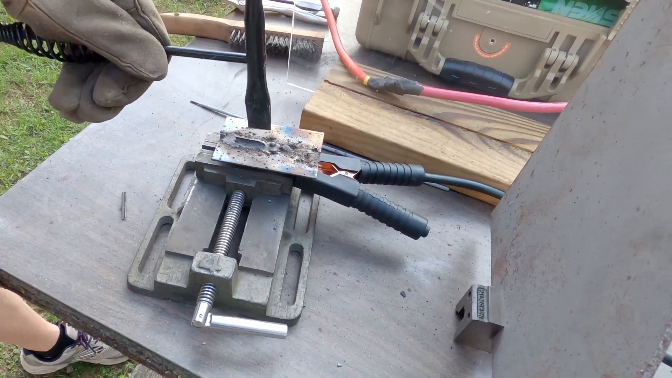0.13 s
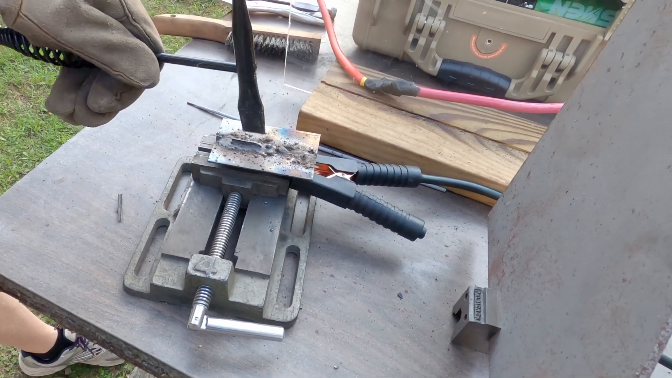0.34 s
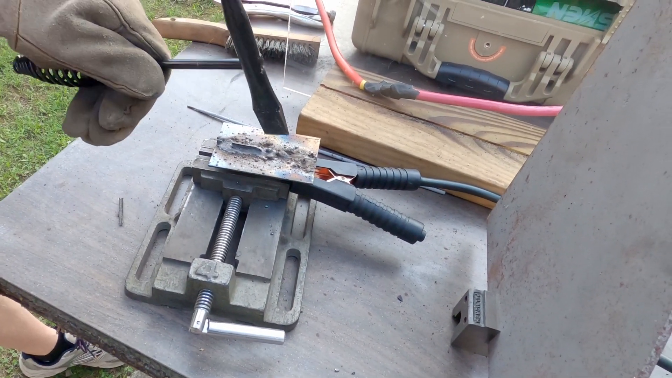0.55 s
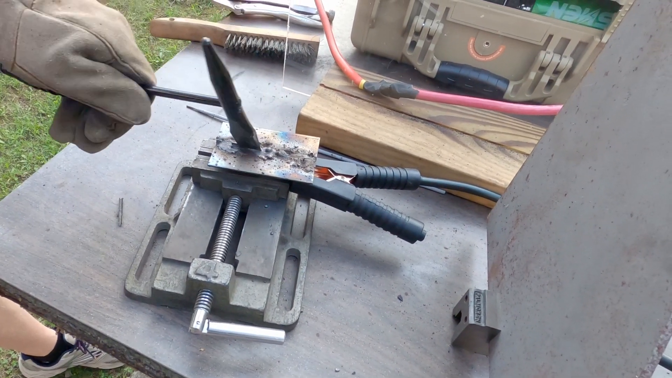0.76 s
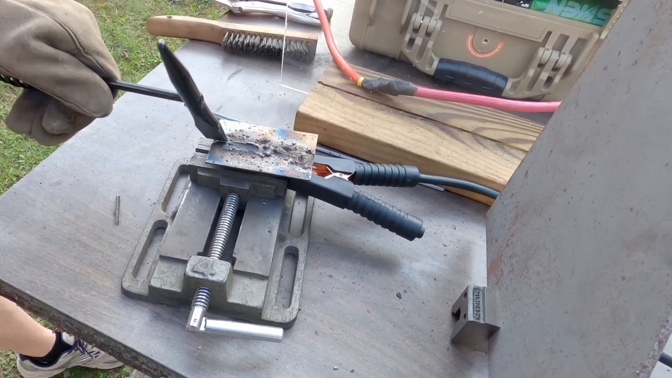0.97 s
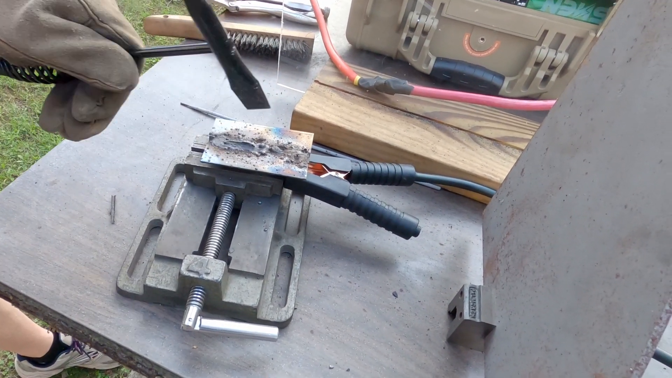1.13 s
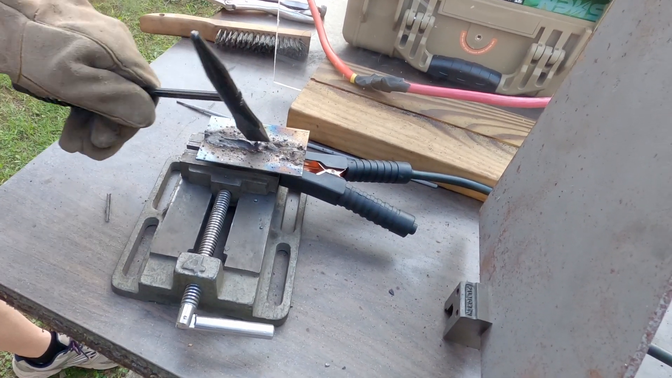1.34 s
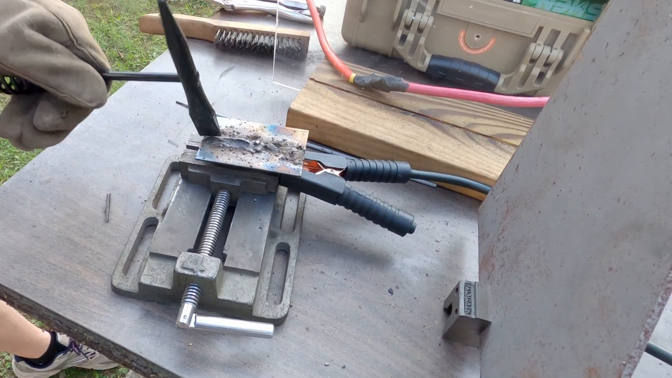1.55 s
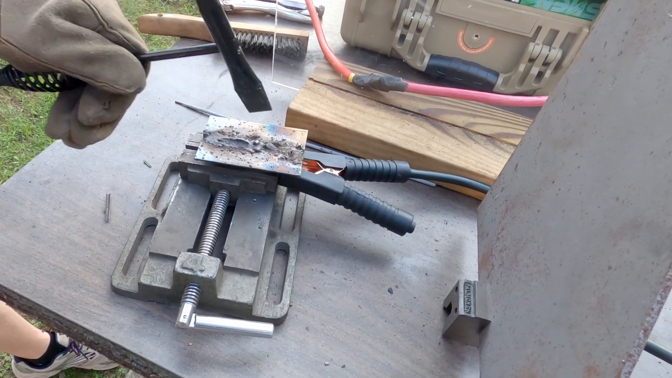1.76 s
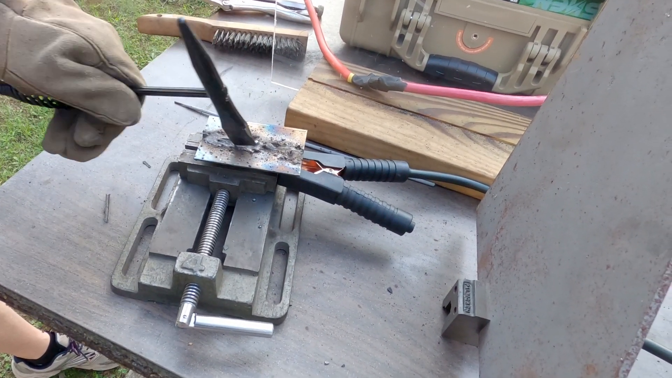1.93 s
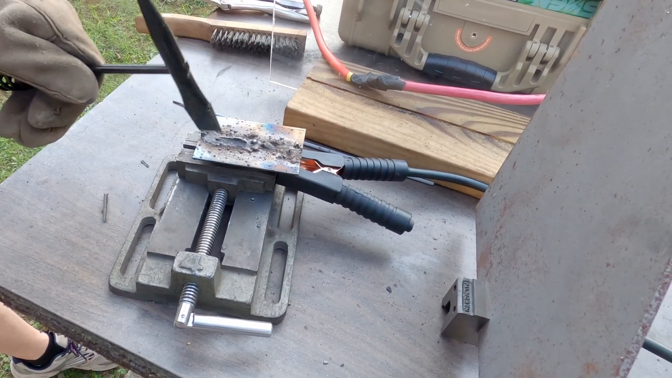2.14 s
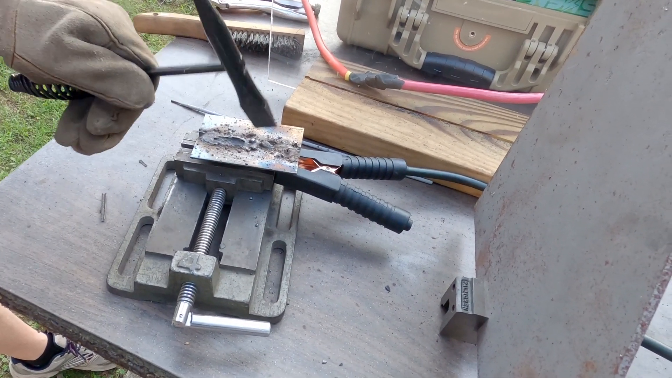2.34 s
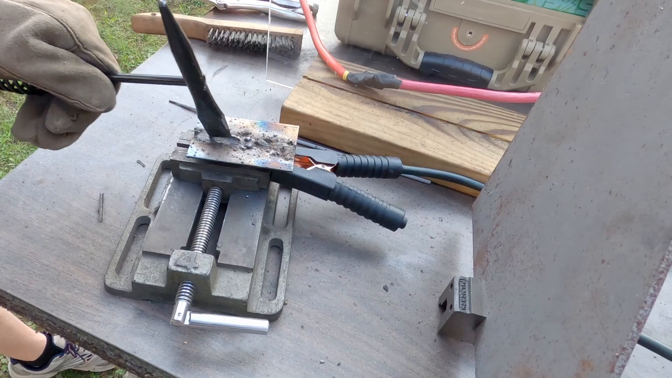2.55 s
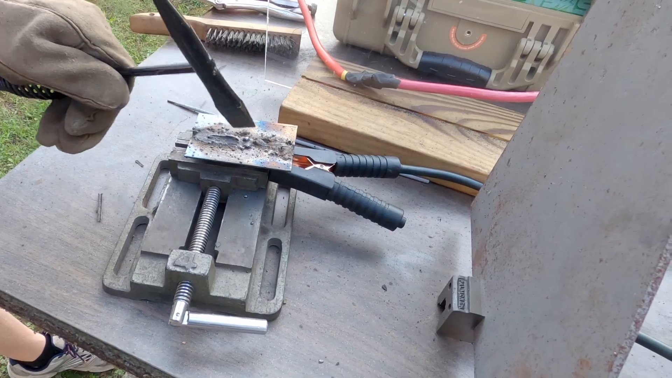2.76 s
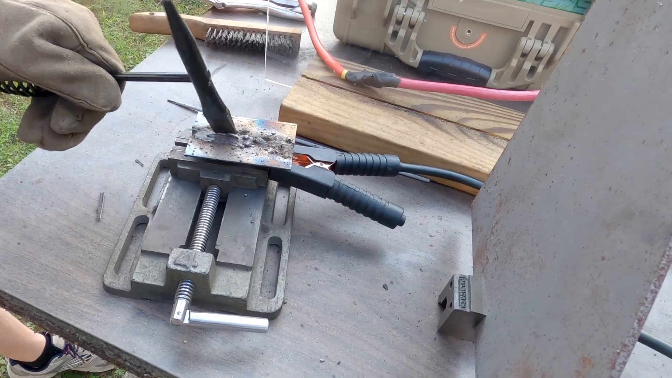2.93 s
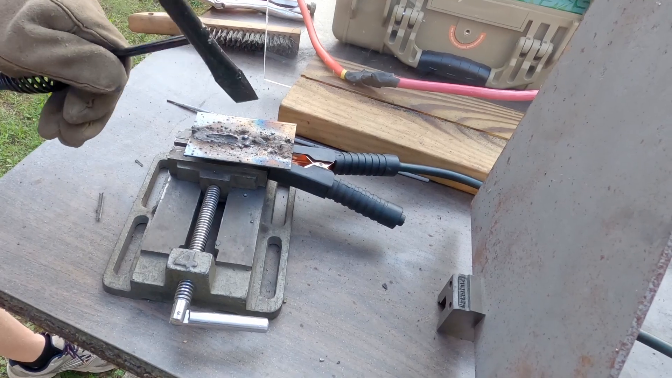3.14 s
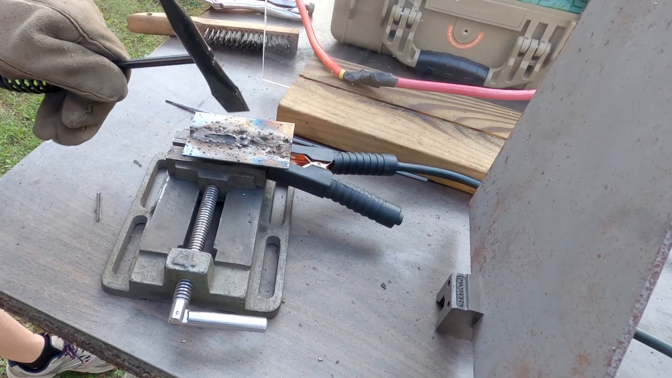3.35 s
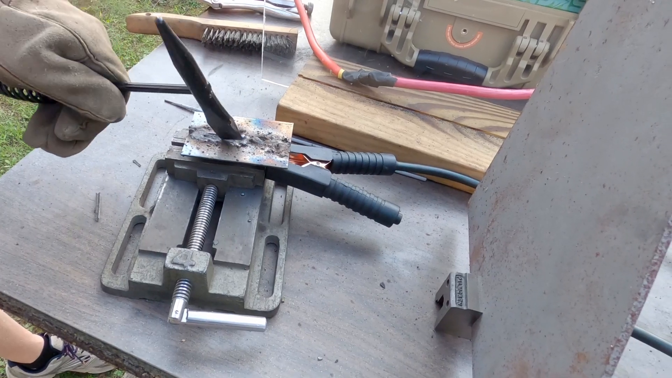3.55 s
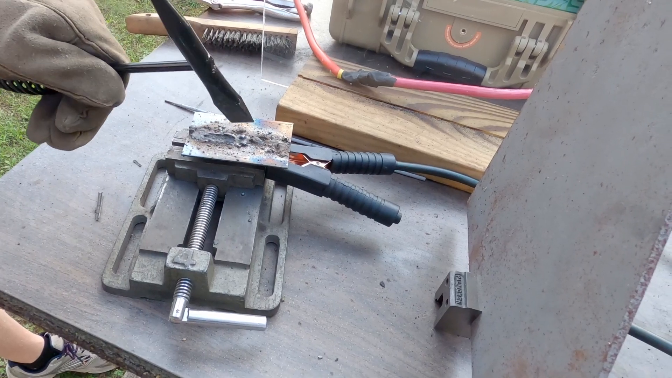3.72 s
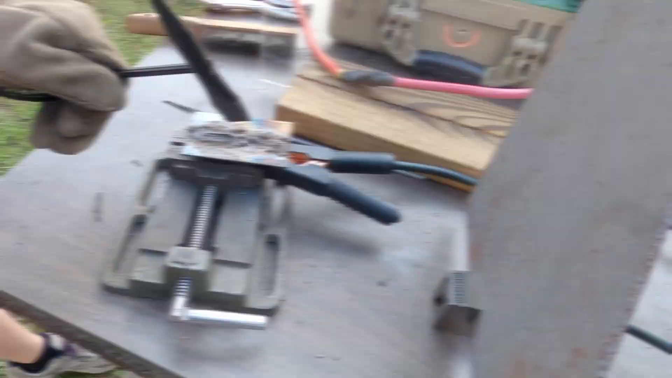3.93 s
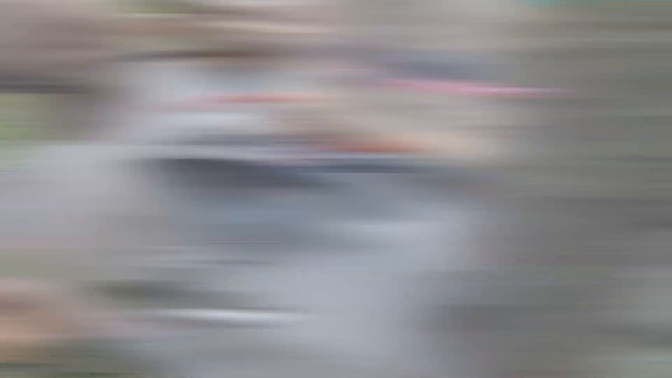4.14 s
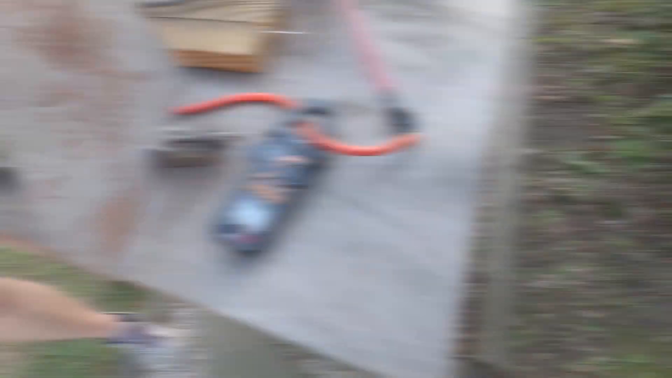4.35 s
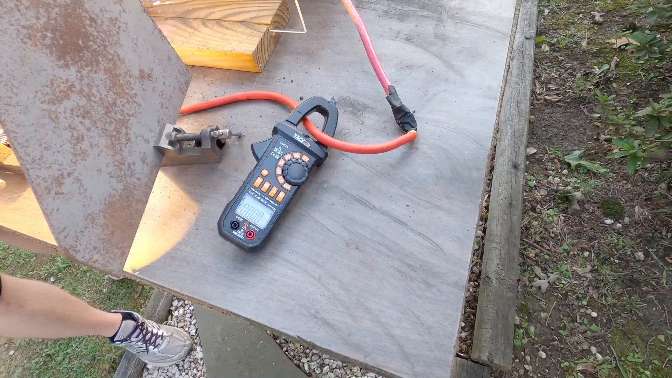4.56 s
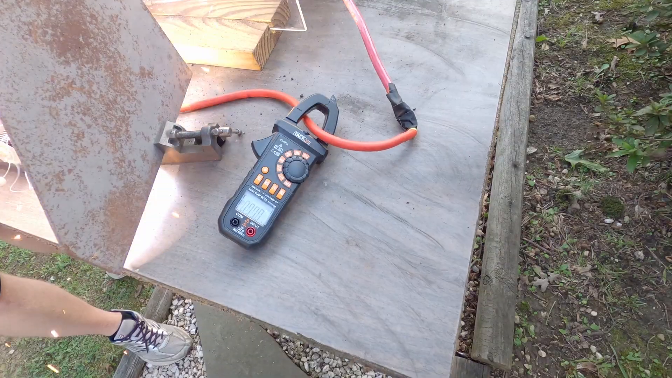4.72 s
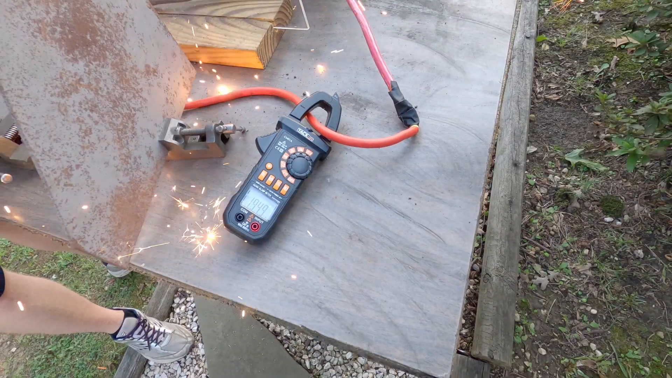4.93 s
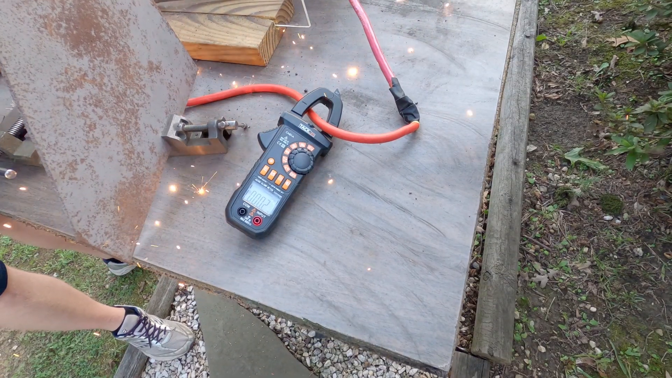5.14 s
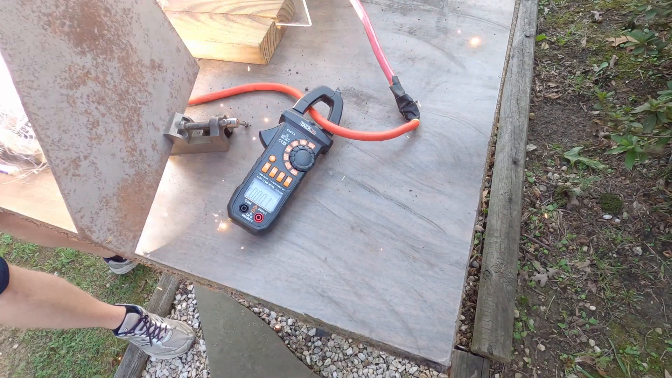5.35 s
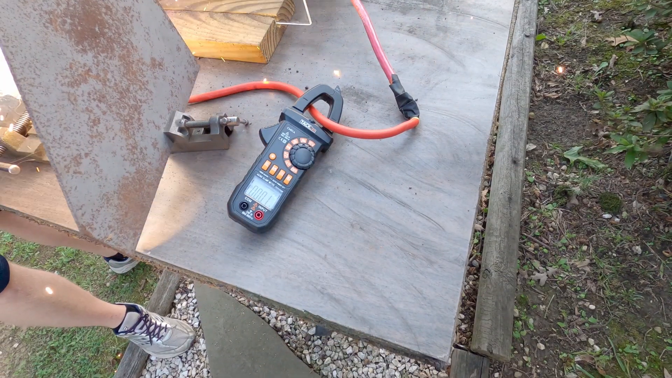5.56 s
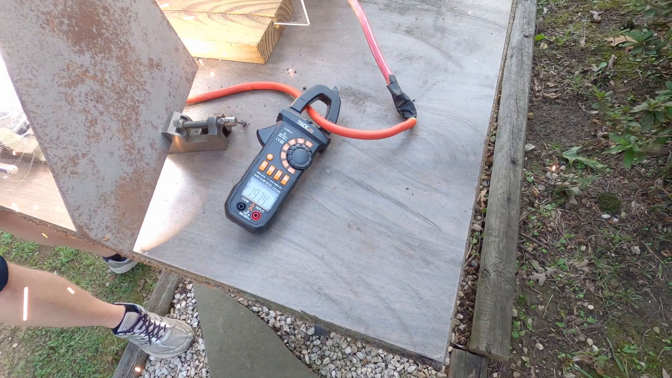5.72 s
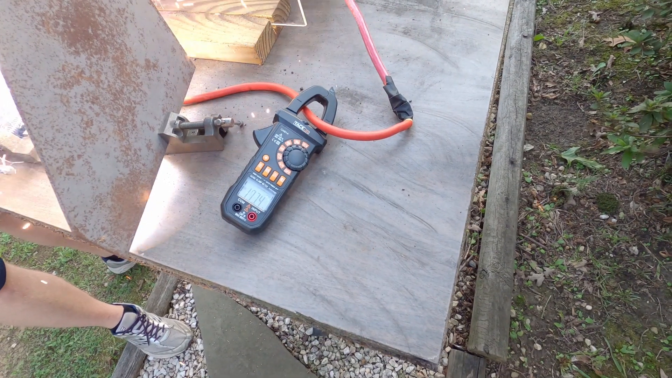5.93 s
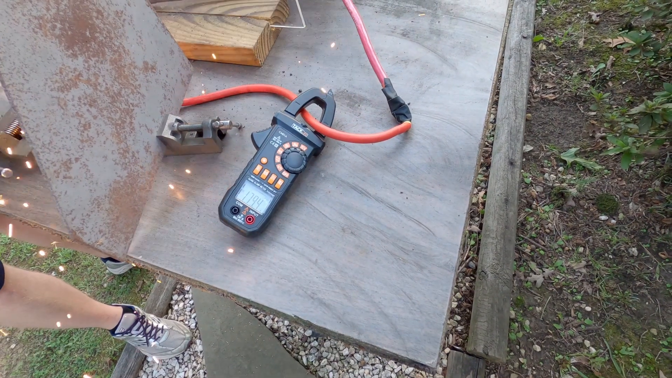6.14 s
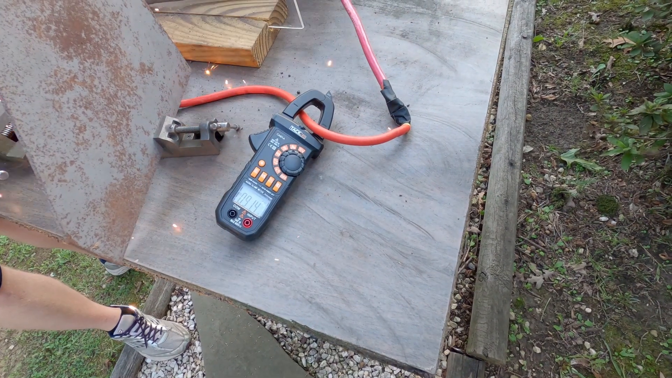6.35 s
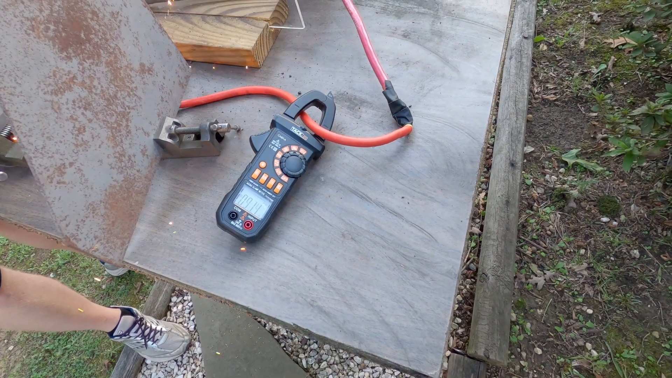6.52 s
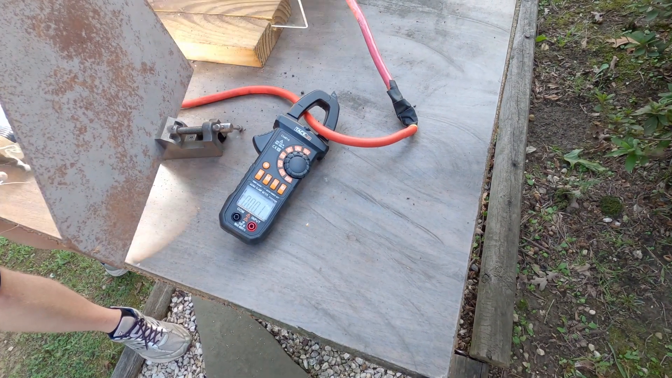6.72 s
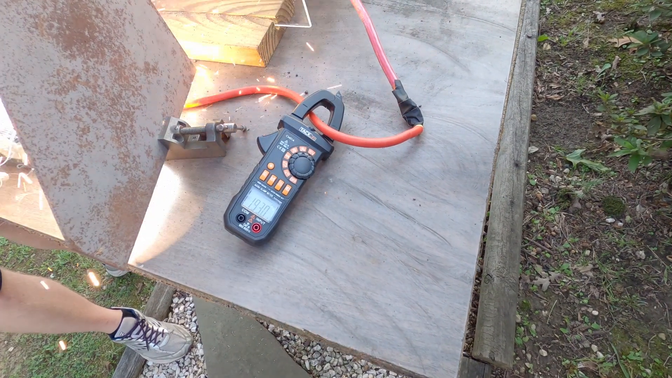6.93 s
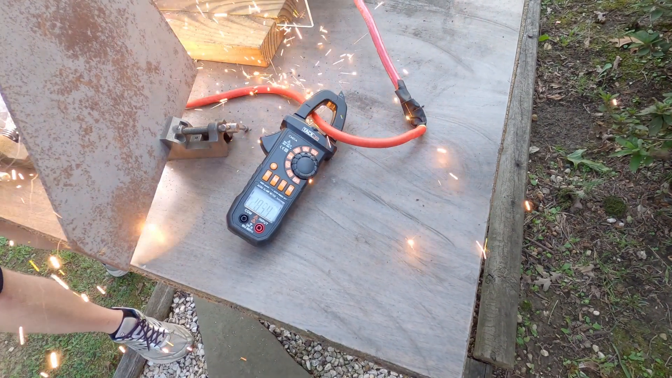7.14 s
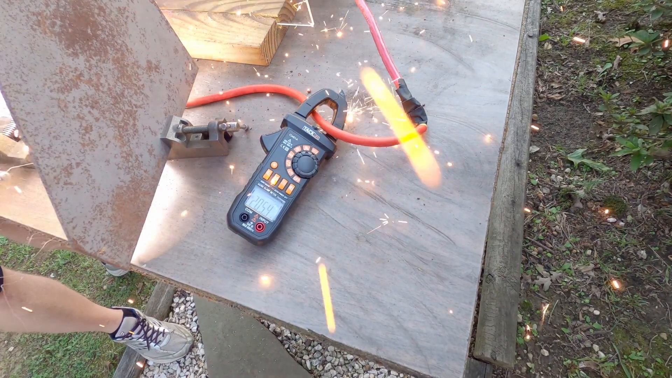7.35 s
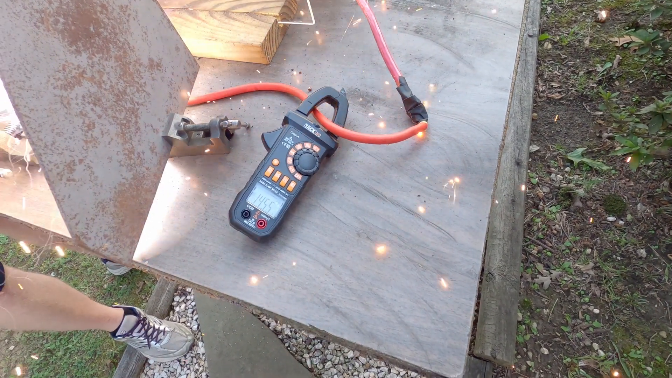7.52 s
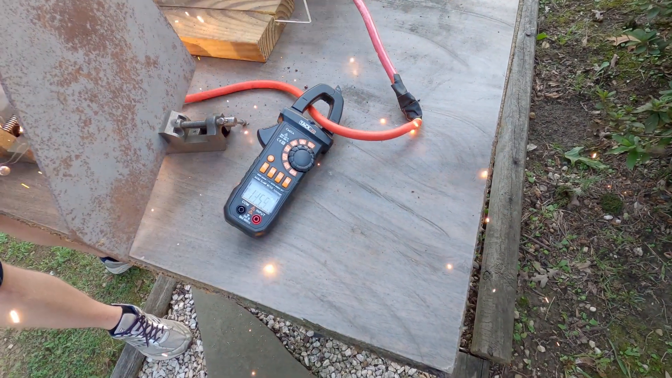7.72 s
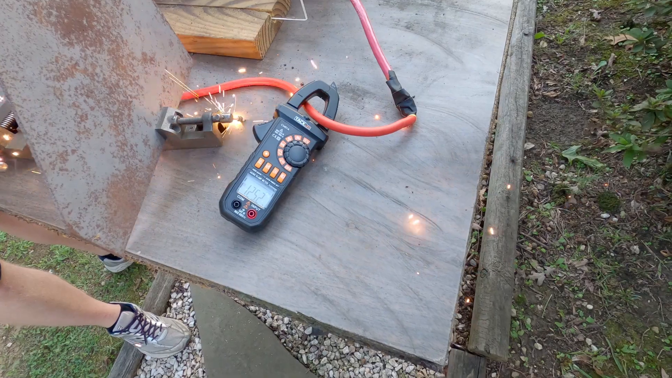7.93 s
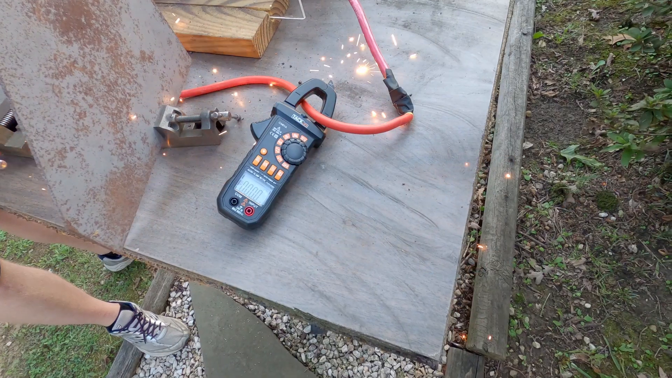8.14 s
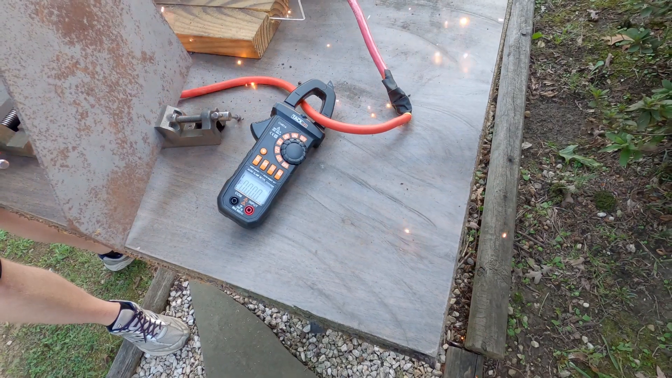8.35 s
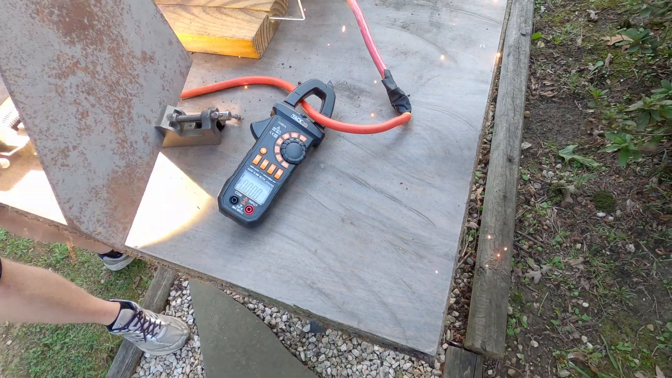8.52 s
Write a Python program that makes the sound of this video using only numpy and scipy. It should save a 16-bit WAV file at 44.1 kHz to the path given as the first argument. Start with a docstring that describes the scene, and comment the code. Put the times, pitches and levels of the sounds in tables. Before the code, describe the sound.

Outdoors at a workbench, close and nearly mono. For the first 0.6 seconds there is only soft lumpy wind, airy hiss, a faint far motor hum and very thin tones. Then a chipping hammer hits steel in a vice at about 0.65, 1.3, 1.9, 2.4, 2.8, 3.2, 3.5, 3.8 and 4.0 seconds: hard, short clanks, varying from dull to bright, slightly overloaded, with little rebound ticks and gritty slag scrapes after them. At 4.2 an abrupt cut drops the background, with a low bump. A welding arc burns at 4.4-4.75, blips at 5.06, burns at 5.3-6.1 and 6.7-7.6, and again briefly at 8.45-8.6. Each burn is a bright, ragged frying hiss with low roar, uneven lulls and loud snapping spits; the first three start with a rod tap. Between them come fading slag fizz, tiny spark ticks, faint bumps and quiet wind.

```python
"""First a chipping hammer strikes and scrapes slag off a steel plate in a vice on an outdoor bench:
decaying steel modes are struck by blows and taps, then driven by grit, over a far motor hum and thin tones.
After a cut to a quieter moment a welding arc behind a steel screen strikes five times: filtered noise hisses
and roars, impulses spit, and dull bumps, sparks and cooling slag follow.
Wind and a background hiss, both of shaped noise, lie under both moments."""
import sys
import numpy as np
from scipy import signal
from scipy.fft import rfft, irfft, next_fast_len
from scipy.io import wavfile

SR = 44100
rng = np.random.default_rng(int(sys.argv[2]) if len(sys.argv) > 2 else 0)


def gain_from_db(level_db):
    """Convert decibel levels to linear amplitude factors (20 dB per decade)."""
    decades = np.asarray(level_db, float) / 20
    return 10 ** decades


def wrap_up_sound(samples):
    """Save the sound to the file named by the first command line argument, as 16-bit audio."""
    columns = np.atleast_2d(samples).T
    # keep every value between -1 and 1, then stretch to whole-number steps
    tamed = np.clip(columns, -1, 1)
    steps = np.round(tamed * 32767).astype(np.int16)
    wavfile.write(sys.argv[1], SR, steps)


N = 378378
TIME = np.arange(N) / SR
CUT_S = 4.215  # the hammer's moment ends, the arc's begins


def hammer():
    """Superposition: blows, lighter taps and scrapes add linearly."""
    return blows() + taps() + scrapes()


# hammer blows; treble and body depend on where the edge lands:
# (t/s, peak level/dB, treble level/dB, body ring level/dB)
BLOW_EVENTS = [(0.652, -3.5, -10.5, -4), (1.291, -3, -7.5, -5.5), (1.862, -7, 5, 12), (2.37, -2, 0.5, 10),
               (2.803, -5, -13, 1.5), (3.201, -3, -12, -1.5), (3.529, 0.5, -4, 2.5), (3.786, -1.5, -4.5, 7),
               (3.983, -9, 4, 5)]


def blows():
    """Impact excitation: each blow sets the steel's modes ringing, body and thud together."""
    out = np.zeros(N)
    rise_s = 0.0017
    for start, db, treble_db, body_db in BLOW_EVENTS:
        blow = knock(treble_db, thud_db=body_db - 1.5, middle_db=body_db, crack_db=1.0,
                     sweep_db=-2.5, decay_scale=1.2, rise_s=rise_s)
        add(out, start - rise_s / 2, gain_from_db(db) * blow)
    return out


# rebounds and slag chips between the blows: (t/s, peak level/dB, treble level/dB)
TAP_EVENTS = [(0.701, -26, 13), (0.715, -32, -6), (0.732, -24.5, -15), (0.934, -28.5, -42),
              (0.963, -37, 12), (.981, -40, 0), (1.338, -25, -34), (1.364, -25.5, 4), (1.384, -24.5, 6),
              (1.398, -20, -4), (1.467, -41, -19), (1.512, -24, -17), (1.538, -22.5, -24), (1.888, -27, -8),
              (1.922, -28, 5), (1.984, -23.5, -8), (1.998, -20.5, -10), (2.009, -26, -8), (2.046, -24, -16),
              (2.435, -33.5, 5), (2.472, -29, -17), (2.503, -26, -16), (2.847, -25, -10), (2.859, -32, -20),
              (2.898, -31.5, -16), (2.928, -33.5, 25), (3.567, -36, -12), (3.977, -36, -3),
              (3.987, -17, -17)]


def taps():
    """Light impact: a weak contact leaves the low modes and the bending wave little energy."""
    out = np.zeros(N)
    for start, db, treble_db in TAP_EVENTS:
        tap = knock(treble_db, thud_db=-18.0, middle_db=-7, crack_db=-1.5, sweep_db=-17.5,
                    decay_scale=1.3, rise_s=0.0016)
        add(out, start, gain_from_db(db) * tap)
    return out


# the chisel edge drags over the slag after a blow:
# (start t/s, length t/s, level/dB below 5 kHz at the start, treble level/dB relative to that)
SCRAPE_STROKES = [(0.691, 0.27, -42.5, -3), (1.329, 0.25, -38.5, -7), (1.898, 0.19, -38, -3),
                  (2.441, 0.14, -41, -6.5), (2.826, 0.14, -42, -2), (3.22, 0.077, -40.5, -3),
                  (3.545, 0.043, -43, -20), (3.822, 0.041, -39, -15), (3.997, 0.071, -42.5, -1)]


def scrapes():
    """Friction as repeated impact: clumps of grit clicks keep the steel ringing."""
    out = np.zeros(N)
    clumps = gain_from_db(2.8 * drift(70))
    lowpass = signal.butter(2, 5000, fs=SR, output="sos")
    fade_db, edge_s = -6.5, 0.025  # pressure eases along a stroke
    for start, length, db, treble_db in SCRAPE_STROKES:
        t = np.arange(SR * 2 // 5) / SR
        clump = clumps[round(start * SR):][:len(t)]
        clicks = rng.standard_normal(len(t)) * (rng.random(len(t)) < 1000 / SR)  # about 1000 per second
        grit = clump * clicks * gain_from_db(2.6 * rng.exponential(1, len(t)))
        # the edge moves on every 40 ms and wakes other modes, in a cycle of three places
        place = (t / 0.04 + 3 * rng.random()).astype(int) % 3
        ring = np.zeros(len(t))
        for k in range(3):
            response = steel(1.7, -0.5, 0.94, spread_db=5, decay_scale=1.2)
            ring += signal.oaconvolve(grit * (place == k), response)[:len(t)]
        crumble = 0.65 * clump * noise(SLAG_CRACK, len(t))
        ring = evened(ring) + crumble
        dull = signal.sosfilt(lowpass, ring)
        mix = evened(dull) + gain_from_db(treble_db) * evened(ring - dull)
        touch = np.clip(np.minimum(t, length - t) / edge_s, 0, 1)
        add(out, start, gain_from_db(db + fade_db * t / length) * touch * mix)
    return out


# spectrum of breaking slag: (f/Hz, density level/dB per Hz)
SLAG_CRACK = [(88, -45), (150, -1.5), (1100, -8.5), (1630, -14.5), (3920, -10.5), (5460, -20), (6020, -17),
              (10000, -26), (16000, -30)]


def knock(treble_db, thud_db, middle_db, crack_db, sweep_db, decay_scale, rise_s):
    """Modal ring plus fracture noise plus a dispersive bending wave, scaled to peak 1."""
    t = np.arange(SR // 5) / SR
    ring = steel(treble_db, thud_db, middle_db, 3.5, decay_scale) * (1 - np.exp(-(t / rise_s) ** 2))
    ring *= 1 + 0.72 * np.exp(-t / 0.021)  # the vice jaws damp the plate soon after the blow
    ring *= gain_from_db(2.2 * np.interp(t, t[::220], rng.standard_normal(len(t[::220]))))  # it chatters in them

    crack = coloured(noise(SLAG_CRACK, len(t)), lambda hz: gain_from_db(shelf(hz, 4000, 0.51 * treble_db + 7.5)))
    rumble = coloured(crack, lambda hz: gain_from_db(shelf(hz, 2500, -14)))  # the bench shakes on, dull
    crack = crack * np.exp(-t / 0.0019) + 0.11 * rumble * np.exp(-t / 0.027)
    crack *= 1 - np.exp(-t / rise_s)

    # the high part of the bending wave arrives first
    sweep_hz, fall_s, peak_s = 1500, 0.006, 0.0019
    turns = sweep_hz * fall_s * (1 - np.exp(-t / fall_s))
    sweep = np.sin(2 * np.pi * turns + 1.2 * rng.standard_normal())
    sweep *= (t / peak_s * np.exp(1 - t / peak_s)) ** 2

    both = ring / abs(ring).max() + gain_from_db(crack_db) * crack + gain_from_db(sweep_db) * sweep
    return both / abs(both).max()


# nominal modes of plate, vice and hammer head: (f/Hz, level/dB, T60 t/s before decay_scale)
STEEL_MODES = [(137, -6, 0.077), (251, -8, 0.14), (461.3, -4.5, 0.054), (592.4, -5.5, 0.065),
               (780, -3, 0.045), (1105, 6, 0.02), (1196, 0, 0.023), (1572, -5.5, 0.024), (2060, 2.5, 0.021),
               (2230, -11, 0.05), (2390, -12.5, 0.06), (2500, -12.5, 0.12), (2682, -8, 0.11),
               (2880, -14.5, .06), (3190, -14.5, 0.074), (3460, -21, 0.07), (3612, -8, 0.045),
               (3777, -6, 0.042), (4130, -15.5, 0.035), (4240, -5, 0.044), (4520, -14.5, 0.062),
               (5024, -11, 0.04), (5400, -18.5, 0.06), (6020, -11.5, 0.1), (6160, -11.5, 0.052),
               (7470, -9, 0.032), (7610, -4, 0.036), (7770, -5, 0.034), (9040, -14.5, 0.076),
               (9700, -6, 0.059), (10360, -4, 0.031), (11190, -4, 0.028), (12200, -10, 0.013)]


def steel(treble_db, thud_db, middle_db, spread_db, decay_scale):
    """Modal superposition: where the edge lands decides how much each damped mode gets."""
    hz, db, t60 = np.transpose(STEEL_MODES)[:, :, None]
    level_chance, pitch_chance, phase_chance = rng.standard_normal((len(STEEL_MODES), 3)).T[:, :, None]
    t = np.arange(SR // 5) / SR
    db = db + spread_db * level_chance
    db = db + (hz > 5000) * treble_db + (hz < 500) * thud_db + (abs(hz - 3400) < 1600) * middle_db
    phase = 2 * np.pi * hz * (1 + 0.0025 * pitch_chance) * t + 1.3 * phase_chance
    return (gain_from_db(db - 60 * t / (decay_scale * t60)) * np.sin(phase)).sum(0)


# each burn of the arc, with a faint fizz leading in: (start t/s, end t/s, hiss level/dB,
# treble share level/dB, low roar level/dB, lead-in t/s)
BURNS = [(4.4117, 4.764, -26, -3, -36.5, 0.0064), (5.0624, 5.087, -27.5, -5, -34, 0.0018),
         (5.323, 6.14, -22, -2.5, -36, 0.001), (6.6989, 7.615, -23, -2.5, -37, 0.011),
         (8.457, 8.589, -21.5, -2, -36.5, .013)]
# the treble resonances change with the place of the rod, one list a burn: (f/Hz, width f/Hz, level/dB)
ROD_PLACES = [
    [(7700, 730, -5), (9760, 770, 1.5), (10160, 480, 5.5), (12100, 980, -2.5), (12700, 510, 0)],
    [(7880, 480, -2.5), (9800, 440, -2.5), (10600, 580, -2), (11500, 630, -3.5), (13500, 970, -1)],
    [(7900, 450, -2), (9300, 230, -7), (9900, 210, 5.5), (11300, 3200, -7.5), (12100, 440, 1)],
    [(7800, 89, 1), (9520, 620, 1.5), (10220, 390, 4), (11700, 350, 4), (13340, 520, 0.5)],
    [(7600, 280, -8.5), (9400, 1400, -8.5), (10700, 700, -7), (11700, 390, 0), (13400, 850, -11)],
]


def arc():
    """Superposition: five burns, rod taps and sparks, then slag that fizzes as it cools exponentially."""
    out, heat = np.zeros(N), np.zeros(N)
    for (start, end, *levels), reach in zip(BURNS, ROD_PLACES):
        add(out, *strike(start, end, *levels, reach))
        # a longer burn leaves more heat
        heat += (TIME > end) * np.sqrt(end - start) * np.exp(-abs(TIME - end) / 0.083)
    out += rod_taps() + sparks()
    return out + gain_from_db(-54.0 + 2.7 * drift(41)) * heat * fizz_grit(N)


# the arc falters, or sinks into the pool and turns dull; in a few the treble share rises:
# (middle t/s, length t/s, level change/dB, treble change/dB)
ARC_LULLS = [(4.449, 0.032, -5.5, 1.5), (4.558, 0.015, -4.5, -4), (4.643, 0.015, -4.5, -6),
             (5.418, 0.11, -5, -7), (5.496, 0.02, -12, -2), (5.571, 0.03, -5, -0.5),
             (5.695, 0.02, -9.5, -2), (5.828, 0.094, -5, -0.5), (5.918, 0.024, -11, -1),
             (5.966, 0.058, -7.5, -0.5), (6.032, 0.032, -7.5, -0.5), (6.1, 0.079, -8, -5.5),
             (6.782, 0.029, -10, -2), (6.926, 0.014, -4, 1), (6.76, 0.0074, -5, -5),
             (7.112, 0.035, -8.5, 0.5), (7.151, 0.03, -3, 0.5), (7.191, 0.0065, 0, 2),
             (7.256, 0.064, -7, -1.5), (7.363, 0.066, -4.5, -0.5), (7.407, 0.039, -6.5, -1),
             (7.459, 0.0095, -10, 1), (7.497, 0.031, -5.5, -2), (7.549, 0.056, -4, 0)]


def strike(start, end, hiss_db, treble_db, roar_db, lead_s, reach):
    """Source and filter: hiss, roar and spits of one burn, followed by the screen's decaying reverberation."""
    t = np.arange(start - 0.02, start + 1.1, 1 / SR)
    burning = np.clip(np.minimum((t - start) / 0.00045, (end - t) / 0.0032), 0, 1)
    burning += gain_from_db(-14) * (t < start) * (t > start - lead_s)
    surge_db = 3 * np.exp(-abs(t - start) / 0.069)  # as the rod touches
    sag_db, dull_db = sum(np.outer(db, swell(t, middle, length)) for middle, length, *db in ARC_LULLS)
    if end - start < 0.1:  # a short burn dies away throughout, by 480 dB per second
        sag_db = sag_db - 480 * (t - (start + end) / 2)

    flame = hiss(treble_db + dull_db, reach)
    low = roar(len(t), roar_db + sag_db + surge_db, reach)
    snaps, spent = spits(t, start, end, burning, sag_db, reach)
    frying = gain_from_db(hiss_db + sag_db + surge_db) * flame / (1 + 20 * spent)
    lit = burning * (frying + low) + snaps

    # the screen rings on faintly
    tail = np.exp(-np.arange(SR // 8) / (0.012 * SR)) * rng.standard_normal(SR // 8)
    return t[0], lit + gain_from_db(-13.5) * signal.oaconvolve(lit, tail / np.linalg.norm(tail))[:len(t)]


# spectral tilt of the hiss: (f/Hz, level/dB)
FRY_TILT = [(1000, -1.5), (3300, 1), (8000, -3.5)]


def hiss(treble_share_db, reach):
    """Subtractive synthesis: noise with random puffs passes a moving comb of resonances."""
    n = len(treble_share_db)
    clicks = (rng.random(n) < 300 / SR) * gain_from_db(3.5 * np.minimum(rng.exponential(1, n), 4))
    puffs = signal.lfilter([1], [1, -np.exp(-1 / (0.0015 * SR))], clicks) * rng.standard_normal(n)
    fry = rng.standard_normal(n) * gain_from_db(1.6 * drift(60)[:n]) + 1.3 * evened(puffs)

    def body_gain(hz, shift):
        band = gain_from_db(read(FRY_TILT, hz)) / (1 + (550 / (hz + 1)) ** 4) / (1 + (hz / 8500) ** 12)
        return screen(hz * (1 + shift), reach) * band

    # the rod moves and the resonances shift by up to 3 %
    near = coloured(fry, lambda hz: body_gain(hz, -0.03))
    far = coloured(fry, lambda hz: body_gain(hz, 0.03))
    place = (1 + np.tanh(drift(12)[:n])) / 2
    body = np.sqrt(place) * near + np.sqrt(1 - place) * far
    top = coloured(fry, lambda hz: screen(hz, reach) / (1 + (8500 / (hz + 1)) ** 12))
    share = np.minimum(gain_from_db(treble_share_db + 1.6 * drift(24.27)[:n]), 0.97)
    return np.sqrt(1 - share ** 2) * evened(body) + share * evened(top)


def roar(n, level_db, reach):
    """Amplitude-modulated band noise: low turbulence between about 120 and 750 Hz."""
    def gain(hz):
        return screen(hz, reach) / (1 + (hz / 750) ** 4) / (1 + (120 / (hz + 1)) ** 4)

    low = coloured(rng.standard_normal(n), gain)
    return gain_from_db(level_db + 3.6 * drift(49.1)[:n]) * evened(low)


# the loud spits of molten metal: (t/s, level/dB)
LOUD_SPITS = [(4.4132, -14), (4.4338, -3), (4.4565, -2), (4.4714, 6.5), (4.5385, -1), (4.5425, 2.5),
              (4.6017, 12), (4.6473, 2), (4.65, -2), (4.6671, 4.5), (4.7511, -5.5), (5.0625, -26.5),
              (5.3272, -7), (5.3338, 5), (5.365, 5.5), (5.468, 0), (5.4793, 4), (5.5059, 3), (5.516, -4.5),
              (5.528, -7), (5.5866, -1), (5.6206, 0), (5.6512, 5.5), (5.7066, -1), (5.73, 7),
              (5.7472, -0.5), (5.7647, 5), (5.8178, 0), (5.8856, -10), (5.9344, -6.5), (6.0058, -3),
              (6.0508, 3), (6.7003, 4), (6.7082, 0), (6.7255, 1), (6.7334, 1), (6.7486, 11.5), (6.762, 8.5),
              (6.8102, -1), (6.82, -3.0), (6.8796, 3.5), (6.8885, -6), (6.893, 2.5), (6.9093, -1),
              (6.958, -8), (6.9822, 3.5), (6.9867, 0), (7.0159, 4), (7.0282, 0.5), (7.065, -21),
              (7.1238, 3.5), (7.1285, -3), (7.177, -1.5), (7.1826, 3.5), (7.1952, 0), (7.2152, 0.5),
              (7.2734, -4), (7.2778, -0.5), (7.294, 2.5), (7.3203, 2), (7.348, -0.5), (7.4462, 6),
              (7.4704, -6), (7.4737, -1), (7.507, -7), (7.5102, 2.5), (7.58, -4), (7.5939, 0.5),
              (8.4628, -9), (8.4754, -11), (8.5272, 2), (8.5537, 9)]


def spits(t, start, end, burning, sag_db, reach):
    """Impulse response: each spit, a snap in a short puff, excites the screen; returns snaps and hiss loss."""
    # the smaller ones come by chance, 76 per second of full burning
    small = t[(rng.random(len(t)) < 76 / SR) & (burning == 1)]
    small_db = -13.5 + 2.5 * drift(400)[:len(t)] + sag_db
    out, u = np.zeros(len(t)), np.arange(-400, 600) / SR
    for at, db in LOUD_SPITS + list(zip(small, np.interp(small, t, small_db))):
        if start < at < end:
            snap = 0.66 * (u == 0) * rng.choice([-1, 1])
            sharp = np.exp(-abs(u) / np.where(u < 0, 0.00012, 0.0011))
            slow = 0.38 * np.exp(-abs(u) / np.where(u < 0, 0.003, 0.005))
            puff = (sharp + slow) * rng.standard_normal(len(u))
            tilt_db = 3 * rng.standard_normal()  # some spits are dull, some bright
            spit = coloured(0.027 * puff + snap, lambda hz: gain_from_db(shelf(hz, 8700, tilt_db) - tilt_db / 2))
            add(out, at + u[0] - t[0], gain_from_db(db) * spit * (at + u > start))

    def path(hz):
        direct = 0.45 / (1 + (1500 / (hz + 1)) ** 2) / (1 + (hz / 13500) ** 6)  # passes the screen's colour by
        return screen(hz, reach) + direct

    unit = abs(coloured(1.0 * (u == 0), path)).max()  # peak of one snap
    snaps = coloured(out, lambda hz: path(hz) / (1 + (300 / (hz + 1)) ** 2)) / unit
    # the hiss thins after a droplet parts
    spent = signal.lfilter([0.0015], [1, -np.exp(-1 / (0.016 * SR))], abs(out))
    return snaps, spent


# nominal resonances of screen and bench that colour the arc: (f/Hz, width f/Hz, level/dB)
SCREEN_MODES = [(281, 197, -1.5), (616, 120, -8.5), (1025, 137, -7), (1540, 140, -3), (1940, 640, -13),
                (3285, 154, 0.5), (4044, 193, -6.5), (4540, 142, -0.5), (5530, 98, 0), (5680, 300, -6),
                (6960, 380, -11.5), (15800, 2200, -8)]


def screen(hz, reach):
    """Interference: neighbouring resonances of opposite sign leave notches between them."""
    gain = 0.032
    for k, (f, width, db) in enumerate(sorted(SCREEN_MODES + reach)):
        gain = gain + (-1) ** k * gain_from_db(db) / (1 + 2j * (hz - f) / width)
    return gain


# the rod knocks on the work as it strikes: (t/s, peak level/dB)
ROD_KNOCKS = [(4.4111, -10), (5.0609, -14), (5.324, -13)]


def rod_taps():
    """Impact excitation: a fast contact rings the steel, dull in the treble and short."""
    out = np.zeros(N)
    for start, db in ROD_KNOCKS:
        tap = knock(-13.5, thud_db=-8.0, middle_db=5.5, crack_db=0.5, sweep_db=-15,
                    decay_scale=0.69, rise_s=0.00031)
        add(out, start, gain_from_db(db) * tap)
    return out


# sparks land on the bench: (t/s, starting level/dB)
SPARK_TICKS = [(4.827, -49.5), (4.8494, -51.5), (4.995, -52), (5.1466, -48), (7.723, -49), (7.826, -46.5),
               (8.127, -52.5)]


def sparks():
    """Exponential decay: each landing is a short burst of fading noise."""
    out = np.zeros(N)
    for start, db in SPARK_TICKS:
        add(out, start, gain_from_db(db) * fizz_grit(800) * np.exp(-TIME[:800] / 0.0092))
    return out


def fizz_grit(size):
    """Spectral shaping: noise that falls towards the treble, for sparks and cooling slag."""
    return noise([(300, -6), (2500, -9.0), (16000, -15.5)], size)


# dull bumps of the bench: (t/s, level/dB, f/Hz)
BENCH_BUMPS = [(4.27, -26.5, 65.5), (6.35, -36.5, 58.3), (7.793, -39, 84), (7.977, -37, 59.2),
               (8.206, -35.5, 61.2)]


def bumps():
    """Damped oscillator: each bump is a low sine that dies away in hundredths of a second."""
    out, u = np.zeros(N), TIME[:SR // 8]
    for start, db, hz in BENCH_BUMPS:
        envelope = np.minimum(u / 0.00031, 1) * np.exp(-u / 0.011)
        add(out, start, gain_from_db(db) * np.sin(2 * np.pi * hz * u + 0.63) * envelope)
    return out


def yard():
    """Superposition: the background sources add; hum and thin tones stop at the cut."""
    return air() + wind() + (TIME < CUT_S) * (hum() + tones()) + whistles() + bumps()


# wind strength, before its random lumps: (t/s, level/dB)
WIND_LEVEL = [(0.0, -41.5), (0.31, -47.5), (2.03, -41), (2.7, -48.5), (3.85, -41.5), (4.66, -48.5),
              (6.62, -50.5), (6.95, -41.5), (7.65, -51.5), (8.58, -50.5)]
# wind spectrum: (f/Hz, density level/dB per Hz)
WIND_SPECTRUM = [(8.8, -35), (15, 2), (63, -12.5), (81, -8.5), (139, -17.5), (162, -46.5), (250, -22.5),
                 (320, -45), (550, -120)]


def wind():
    """Amplitude-modulated noise: low-frequency noise swells in lumps."""
    level_db = np.interp(TIME, *np.transpose(WIND_LEVEL)) + 2.6 * drift(6)
    return gain_from_db(level_db) * noise(WIND_SPECTRUM, N)


# far motor, about which pitch and level wander: (t/s, f/Hz, peak level/dB)
MOTOR_HUM = [(0.0, 82, -61), (0.151, 87.0, -53.5), (4.2, 95.5, -46.5)]


def hum():
    """Frequency modulation: one sine whose pitch and level wander at random."""
    s, hz, db = np.transpose(MOTOR_HUM)
    turns = np.cumsum(np.interp(TIME, s, hz) * (1 + 0.066 * drift(25))) / SR
    return gain_from_db(np.interp(TIME, s, db) + 2.1 * drift(41)) * np.sin(2 * np.pi * turns)


# thin tones of fixed pitch: (f/Hz, rms level/dB before its slow wander)
THIN_TONES = [(1351, -69), (12021, -79.5)]


def tones():
    """Additive synthesis: fixed sines with slowly wandering levels."""
    return sum(np.sqrt(2) * gain_from_db(db + 2.5 * drift(3.8)) * np.sin(2 * np.pi * hz * TIME)
               for hz, db in THIN_TONES)


# faint fuzzy whistles swell and fade: (middle t/s, length t/s, level/dB, f/Hz, width f/Hz)
FUZZY_WHISTLES = [(.78, .8, -61, 3060, 200), (2.71, .18, -59, 3100, 150)]


def whistles():
    """Narrow-band filtering: noise near one frequency is heard as a fuzzy pitch."""
    out = np.zeros(N)
    for middle, length, db, hz, width in FUZZY_WHISTLES:
        fuzz = coloured(rng.standard_normal(N), lambda f: 1 / (1 + ((f - hz) / width) ** 2))
        out += gain_from_db(db) * swell(TIME, middle, length) * evened(fuzz)
    return out


# background spectra, one list before and one after the cut: (f/Hz, density level/dB per Hz)
AIR_SPECTRA = ([(100, -17), (150, 1), (240, -2.5), (500, -6.5), (1170, -13.5), (1720, -17.5), (3040, -21),
               (4500, -22.5), (6300, -23.5), (7200, -18), (8500, -24.5), (16000, -25)], [(100, -37),
               (150, -8.5), (250, -16), (400, -16), (1120, -26), (2270, -30.5), (6300, -30.5), (7300, -27),
               (8500, -31), (16000, -34)])


def air():
    """Spectral shaping: broadband hiss whose colour and level change at the cut."""
    before, after = (gain_from_db(db) * noise(points, N) for points, db in zip(AIR_SPECTRA, (-51, -59)))
    return np.where(TIME < CUT_S, before, after) * gain_from_db(1.6 * drift(19))


def evened(x):
    """Normalisation: scales to rms 1."""
    return x / np.sqrt(np.mean(x ** 2) + 1e-20)


def read(points, hz):
    """Interpolates a spectrum along logarithmic frequency."""
    f, value = np.transpose(points)
    return np.interp(np.log(hz + 1), np.log(f + 1), value)


def add(mix, start, sound):
    """Superposition: adds a sound into the mix from start, in seconds."""
    part = mix[round(start * SR):][:len(sound)]
    part += sound[:len(part)]


def coloured(x, gain):
    """Linear filtering: multiplies the spectrum by a gain given as a function of Hz."""
    size = next_fast_len(len(x) + 4096)
    return irfft(rfft(x, size) * gain(np.fft.rfftfreq(size, 1 / SR)), size)[:len(x)]


def noise(points, size):
    """Spectral shaping: Gaussian noise of a given spectrum and rms 1."""
    return evened(coloured(rng.standard_normal(size), lambda hz: gain_from_db(read(points, hz))))


def drift(per_s):
    """Random modulation: straight lines between normal draws of rms 1, per_s of them a second."""
    steps = np.arange(0, N + SR, SR / per_s)
    return np.interp(np.arange(N), steps, rng.standard_normal(len(steps)))


def shelf(hz, corner_hz, db):
    """Shelving filter: gain in dB that sets in above the corner."""
    return db / (1 + (corner_hz / (hz + 1)) ** 4)


def swell(t, middle, length):
    """Envelope: a smooth bump of height 1."""
    return np.exp(-(2 * (t - middle) / length) ** 4)


def scene():
    """Superposition: hammer, arc and background, alike on two channels."""
    return np.tile(hammer() + arc() + yard(), (2, 1))


def roll_off(x):
    """The treble ends steeply here."""
    return signal.sosfilt(signal.butter(12, 16580, fs=SR, output="sos"), x)


def record(dry):
    """Saturation and band limiting: one microphone on both channels with a trace of difference."""
    odd = dry[0] * (gain_from_db(-42) * drift(300) + gain_from_db(-28.5) * rng.standard_normal(N))
    overloaded = np.tanh((dry + [odd, -odd]) / 1.11) * 1.438
    lowpass = signal.firwin(255, 15850, window=("kaiser", 8), fs=SR)
    mix = signal.oaconvolve(overloaded, lowpass[None], "same")
    return roll_off(mix)


dry = scene()
out = record(dry)
wrap_up_sound(out)
```